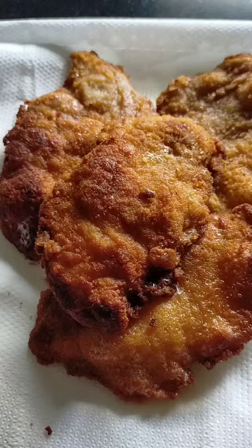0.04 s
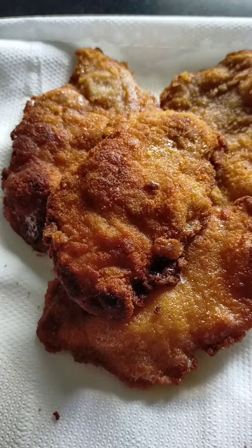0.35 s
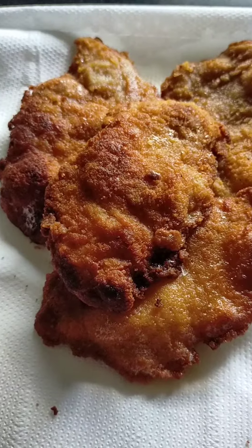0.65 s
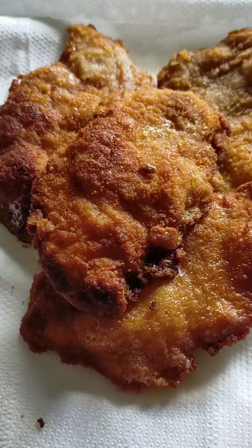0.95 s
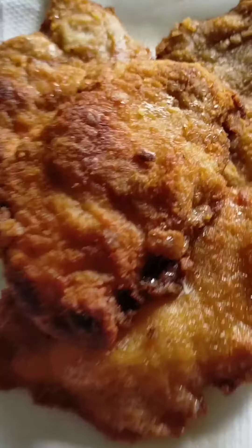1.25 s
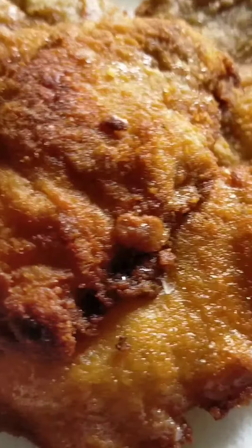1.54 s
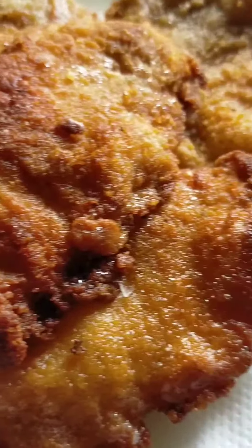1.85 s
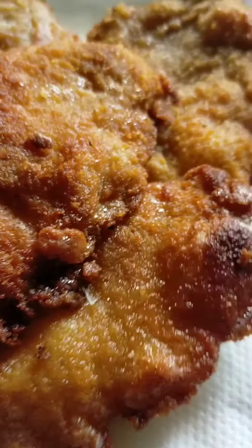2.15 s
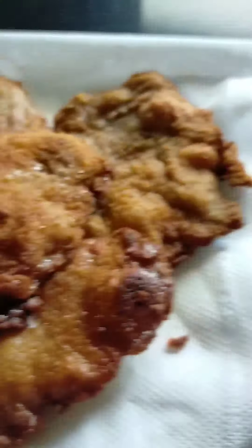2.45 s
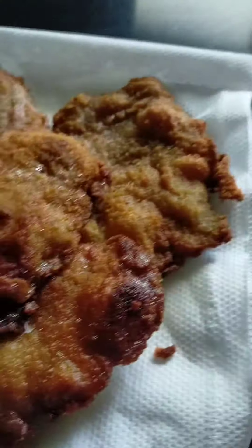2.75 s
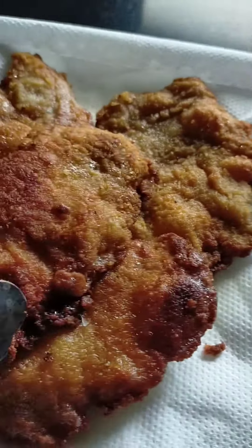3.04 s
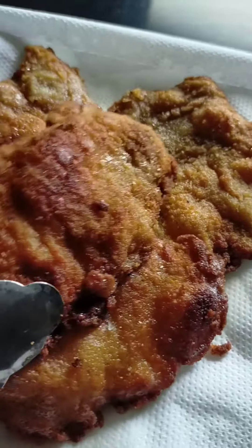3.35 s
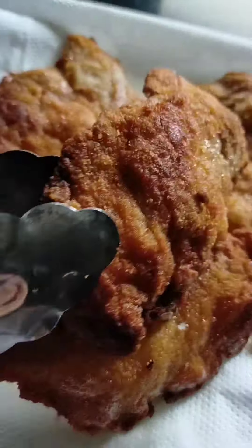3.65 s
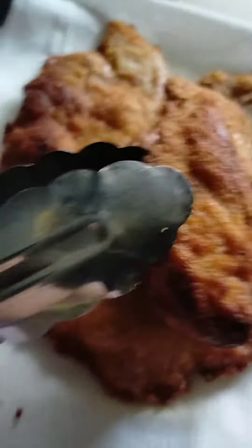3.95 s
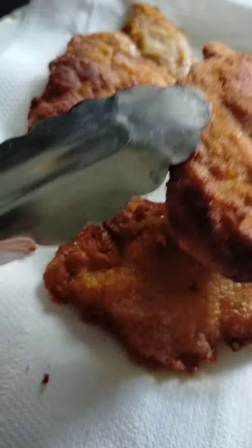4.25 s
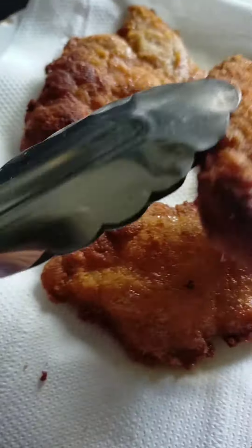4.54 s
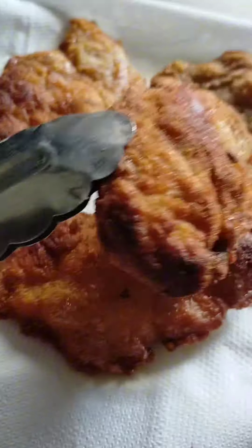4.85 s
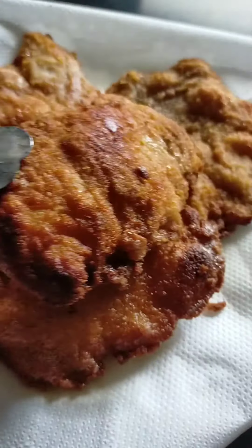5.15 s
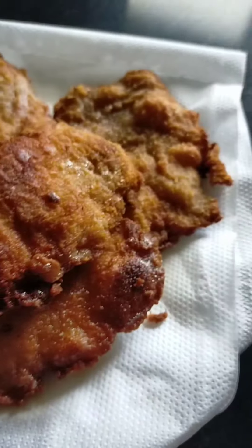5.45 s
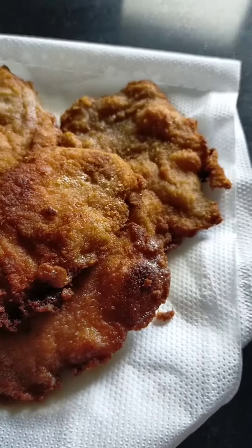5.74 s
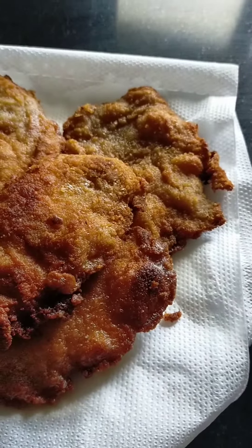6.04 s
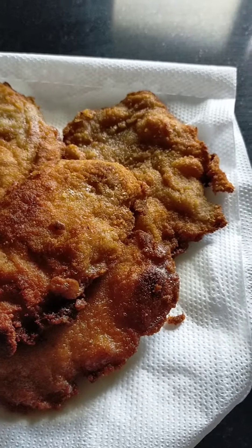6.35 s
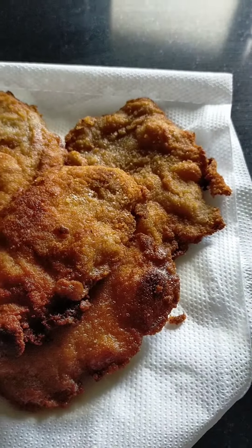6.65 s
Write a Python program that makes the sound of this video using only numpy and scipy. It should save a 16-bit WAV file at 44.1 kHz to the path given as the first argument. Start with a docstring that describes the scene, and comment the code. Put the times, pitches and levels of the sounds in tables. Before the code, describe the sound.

A faint fan hum with a thin hiss and low rumble comes in at about 0.4 seconds in a quiet kitchen. At 1.8 seconds a fingertip taps sharply right at the microphone, followed by a light brush of skin and a few small ticks. From 2.5 seconds steel tongs catch the crust of a fried breaded cutlet, very close: tiny dry crunches, crumb crackles and light metallic clicks, with soft ticks of oily meat beneath. The crunching is strongest around 3 seconds, where the steel rings slightly. Scattered crackles continue until about 4.1 seconds as the cutlet is lifted, then only a few faint ticks follow. A second, softer cluster of crunches comes from 5.1 to 5.6 seconds as it is laid back. The fan then hums on until nearly 7 seconds, with a barely audible distant chirp.

```python
"""A quiet kitchen, a phone's microphone close to the food: steel tongs bite into a crisp breaded cutlet,
lift it off a paper towel and lay it back. Each catch is a few milliseconds of tiny crust fractures,
coloured by the thin steel arms. Every move loads the arms differently and stirs loose crumbs, and the
oily meat ticks softly underneath. Before the tongs arrive a fingertip taps and brushes the phone.
A fan hums nearby, with a few faint chirps far off."""
import sys
import numpy as np
from scipy import signal
from scipy.fft import rfft, irfft, next_fast_len
from scipy.io import wavfile
from scipy.ndimage import uniform_filter1d, map_coordinates

SR = 44100
rng = np.random.default_rng(int(sys.argv[2]) if len(sys.argv) > 2 else 0)


def put_to_file(sound):
    """Save the sound as 16-bit audio at rate SR, in the file named by the first command-line argument."""
    columns = np.atleast_2d(sound).T  # one column per channel
    safe = np.clip(columns, -1, 1)
    whole_steps = np.round(safe * 32767)
    wavfile.write(sys.argv[1], SR, whole_steps.astype(np.int16))


N = 300321
TIME = np.arange(N) / SR

# Levels in the tables are relative; each source sets its own gain.
# clear catches of the tongs on the crust: middle_s, length_s, level_db, crunch_db, sparkle_db
CLEAR_CATCHES = [(2.5409, 0.0047, -43, -8, -6), (2.5633, 0.0087, -48, -2.0, -7),
                 (2.62, 0.0031, -46, -8, 2.0), (2.6287, 0.0041, -41, -8.0, 3.0),
                 (2.712, 0.0032, -40.5, -16, -8), (2.7366, 0.0039, -42, -7.0, -4),
                 (2.7543, 0.0033, -35, -7.0, 5), (2.78, 0.0031, -43, -12, 4), (2.839, 0.0056, -57, 3.5, -3),
                 (2.9042, 0.0019, -42.5, -5, 3.0), (2.9096, 0.0028, -42, -6, 6),
                 (2.944, 0.0037, -32.5, -11, 5), (2.9496, 0.0026, -36.5, -5, 3),
                 (2.979, 0.0032, -31.5, -6.5, 8), (2.989, 0.0057, -39, -11, 1.0),
                 (2.9997, 0.0057, -24.0, -8.5, -2.5), (3.02, 0.0019, -38, 0, 11),
                 (3.0328, 0.0099, -31, -5.5, 1), (3.041, 0.0075, -28, -10.5, 1.0),
                 (3.0503, 0.0069, -23.5, -5, -1.0), (3.0561, 0.0059, -27.5, -8, -0.5),
                 (3.0622, 0.005, -21.5, -13.5, 1), (3.07, 0.008, -28.5, -10, 1),
                 (3.11, 0.0049, -41, -10.0, 1), (3.1328, 0.0044, -46, -8.0, 7),
                 (3.1448, 0.0078, -38.5, -3.5, 1), (3.2678, 0.0031, -35.5, -14, -1),
                 (3.278, 0.0067, -38.5, -13, 1.5), (3.341, 0.0082, -47, -7, 6.0),
                 (3.4254, 0.014, -45, -8.5, -0.5), (3.487, 0.0033, -45.5, -3, 3.5),
                 (3.505, 0.0017, -46.5, -2, 9), (3.5226, 0.0019, -30.5, -11.0, 5.5),
                 (3.59, 0.0032, -54, -13, 2.0), (3.6144, 0.0026, -35.5, -7.5, 0.0),
                 (3.6826, 0.0026, -29.5, -5, 1), (3.6866, 0.0024, -33.5, -4.0, -1.0),
                 (3.733, 0.0055, -51, -12, -2), (3.8555, 0.0019, -53, -20, 5.5),
                 (3.912, 0.0019, -39.0, -0.5, 7), (3.9363, 0.0015, -36.5, -5, 5.5),
                 (3.97, 0.00074, -36, -11, 9), (3.9776, 0.0011, -37, -5.5, 10),
                 (4.0313, 0.002, -36.0, -26, 1.5), (4.0522, 0.002, -43.5, -13.5, 12.5),
                 (4.102, 0.0018, -46, -12, 6), (4.393, 0.0046, -58.5, -0.5, 2.5),
                 (4.541, 0.006, -54.5, -7, 1), (4.7873, 0.0012, -61, 0.0, 14),
                 (4.84, 0.0019, -58.5, -12.0, 8), (5.134, 0.0025, -47.5, -12, 9),
                 (5.1997, 0.0031, -48, -10.0, 4.0), (5.2279, 0.0026, -36, -3, 6.0),
                 (5.231, 0.0043, -42, -2.5, 11.5), (5.2466, 0.006, -41, -9, -1),
                 (5.2766, 0.0048, -34, -15, 5), (5.2842, 0.0048, -33.5, -10.5, 2),
                 (5.298, 0.0097, -43.5, -5, 7), (5.3346, 0.0028, -34.5, -10.5, 1),
                 (5.3957, 0.0031, -48, -13, -2.0), (5.5495, 0.0032, -47.5, -14.0, 6.0),
                 (5.5709, 0.0045, -47.0, -10.5, 1.0)]
# tongs gripping, lifting, laying down: start_s, end_s, crumbs_db, nicks_db, arm_clink_hz, tip_clink_hz
TONG_MOVES = [(2.543, 2.645, -46.5, -56, 2800, 7580), (2.74, 2.86, -51, -54.5, 3000, 7120),
              (2.936, 3.0, -46, -51, 2901, 6820), (3.04, 3.08, -58, -54, 3380, 7870),
              (3.094, 3.193, -43, -53, 3386, 7530), (3.23, 3.36, -46.5, -66, 3300, 7400),
              (3.424, 3.755, -50.5, -53.5, 2590, 7480), (3.942, 4.056, -53.5, -50, 3120, 7660),
              (4.373, 4.406, -61.5, -57.5, 1830, 8020), (4.508, 4.671, -72, -64, 1840, 6930),
              (5.047, 5.18, -73, -67.5, 3450, 7000), (5.235, 5.41, -50.5, -60, 3850, 6500),
              (5.525, 5.574, -53, -57, 3970, 7100), (5.593, 5.619, -48.5, -49, 4000, 6100)]
# resonances of the steel arms: pitch_hz, width_hz, level_db
ARM_MODES = [(2528, 320, -7), (3300, 340, -9), (4655, 200, -22), (5950, 150, -7), (6250, 200, -4.5),
             (6530, 200, -7.5), (7620, 180, -7.5), (7760, 83, -4), (10260, 120, -17.5), (10970, 284, -13),
             (13500, 260, -5), (14590, 200, -1.5), (14840, 220, 6.5)]
# what rings on in the steel: pitch_hz, level_db, t60_s
RING_MODES = [(2510, -7, .4), (3284, -6, .6), (3440, -5, .5), (3849, -6, .5), (4640, -9, .5),
              (5720, -4, .4), (6053, -5, .22), (6192, -7, .22), (6853, -4, .3), (7417, -1, .38),
              (7538, -2, .42), (7769, 3, .48), (8064, -5, .55), (9686, -9, .35), (9841, -7, .35),
              (10769, -9, .3), (13360, -5, .45), (14230, -6, .35), (14610, -3, .25), (15036, 2, .32),
              (15177, 2, .32)]
# breaking crust, heard directly: frequency_hz, level_db
CRUST_SPECTRUM = [(300, -37.5), (1000, -3.5), (2200, -4.5), (4300, -5.5), (6500, 5), (8000, 0.5),
                  (9300, -8), (12000, -7.5), (15000, 5.5)]
# soft ticks of oily meat: start_s, level_db, pitch_hz
MEAT_TICKS = [(2.766, -39.5, 556), (2.837, -41, 1030), (2.874, -43, 1024), (2.902, -32, 919),
              (2.962, -33, 964), (2.988, -31.5, 751), (3.03, -39, 653), (3.335, -35, 500),
              (3.383, -37.5, 600)]
# the cutlet dragging over the others: peak_s, rise_fall_s, level_db
MEAT_DRAGS = [(2.57, 0.02, -53.5), (2.765, 0.053, -50), (2.985, 0.0364, -44.5), (3.055, 0.022, -46.5),
              (3.275, .02, -50), (3.34, 0.021, -41), (3.7, 0.16, -54.5)]
# dull rub of the meat: frequency_hz, level_db
MEAT_SPECTRUM = [(60, -15.5), (300, -5), (800, -2), (1600, -10), (3000, -11), (6000, -40)]
# the phone's case ticking under the fingers: start_s, peak_db, brightness_hz
CASE_TICKS = [(1.758, -45, 1490), (1.7765, -38, 1400), (1.781, -36, 900), (1.7995, -39, 1300),
              (1.898, -38.5, 4750), (1.978, -43.5, 7650), (2.056, -52, 10000)]
# light brushes of skin on the case: peak_s, rise_fall_s, level_db
SKIN_BRUSHES = [(1.27, .09, -72), (1.765, 0.063, -54.5), (2.015, 0.051, -64.5), (2.19, 0.034, -63),
                (2.35, 0.035, -69)]
# skin rubbing right by the microphone: frequency_hz, level_db
SKIN_SPECTRUM = [(80, -1), (300, 1.5), (1300, -1), (2500, -5.5), (4300, -12), (5600, -10.5), (7000, -2.5),
                 (9200, -16.5), (13000, -1), (15000, -5)]
# swells of faint low rumble: peak_s, rise_fall_s, level_db
RUMBLE_SWELLS = [(.7, .42, -58.5), (3.35, .07, -61)]
# colour of the low rumble: frequency_hz, level_db
RUMBLE_SPECTRUM = [(12, -10), (30, 0.5), (70, -2.5), (110, -14.5), (250, -35), (800, -79)]
# the fan's draught and the thin hiss over it: time_s, air_db, hiss_db
FAN_LEVELS = [(.41, -64.5, -78), (1.1, -58.5, -73.5), (2.2, -56.5, -74.5), (4.5, -58.5, -75),
              (5.6, -58, -77), (6.8, -60, -80)]
# fan and motor tones: pitch_hz, level_db
MOTOR_TONES = [(36.5, -71.5), (100, -76.5), (246, -66.5), (371.5, -76.5), (495.5, -76), (1017, -80),
               (1238, -83.5)]
# thin whine of a bearing: start_s, end_s, pitch_hz, level_db
BEARING_WHINES = [(.45, 1.75, 2190, -78), (.45, 1.75, 2450, -77.5), (4.4, 7, 2423, -83)]
# air moved by the fan: frequency_hz, level_db
AIR_SPECTRUM = [(15, -31.5), (30, -20), (48, -16), (64, -13.5), (85, -7), (190, -3.5), (240, -0.5),
                (290, -4.5), (400, -8.5), (800, -11.5), (1300, -15.5), (2400, -22), (3800, -32),
                (9000, -47)]
# thin background hiss: frequency_hz, level_db
HISS_SPECTRUM = [(1500, -19.5), (4000, -12.5), (7200, 0), (9300, -7), (12000, -3.5), (15000, -0.5)]
# faint far-off chirps: peak_s, half_length_s, pitch_hz, level_db
FAR_CHIRPS = [(.66, .04, 4400, -84), (1.333, 0.077, 3580, -77), (4.702, 0.074, 4200, -84.5),
              (6.73, 0.055, 4100, -81)]
# the kitchen's reverberation: frequency_hz, t60_s
ROOM_DECAY = [(200, 0.22), (3000, 0.2), (8000, 0.09), (15000, 0.083)]


def catches(rows, sharpness=1.7, attack=.9, gain_db=.16, wander=.04):
    """Close up, each catch is a short avalanche of fractures; the nearest move pitches its two clinks."""
    middle_s, length_s, level_db, crunch_db, sparkle_db = np.transpose(rows)[:, :, None]
    moves = np.array(TONG_MOVES)
    nearest = np.argmin(np.maximum(moves[:, 0] - middle_s, middle_s - moves[:, 1]), axis=1)
    detuning = 1 + wander * rng.standard_normal((len(rows), 2))
    arm_hz, tip_hz = (moves[nearest, 4:] * detuning).T[:, :, None]
    t = np.arange(1792) / SR - .012
    progress = t / length_s
    force = np.exp(-(sharpness * np.where(progress < 0, progress / attack, progress)) ** 2)
    fractures = force * crackle(force.shape, spread_db=3)
    bursts = through_tongs(fractures, crust_db=-12.5, scatter_db=3.5, detune=.0086)
    arm_clink = lambda f: amp(10) * resonance(f, arm_hz, width_hz=260)
    tip_clink = lambda f: amp(4) * resonance(f, tip_hz, width_hz=280)
    bursts = filtered(bursts, lambda f: 1 + arm_clink(f) + tip_clink(f))
    balanced = 0
    for low_hz, high_hz, band_db in [(700, 5000, crunch_db), (5000, 9500, 0), (9500, 16500, sparkle_db)]:
        band = signal.sosfilt(signal.butter(4, [low_hz, high_hz], "band", fs=SR, output="sos"), bursts)
        energy = np.sum(band ** 2, axis=1, keepdims=True) / SR
        balanced += band * np.sqrt(length_s / energy) * amp(level_db + band_db + gain_db)
    track = np.zeros(N)
    for start_s, burst in zip(middle_s[:, 0] + t[0], balanced):
        add(track, start_s, burst)
    return track


def nicks(count=24, per_s=40, length_s=.0037, scatter_db=3, crunch_db=-4.5, sparkle_db=3):
    """The tongs nick the crust in small catches at chance moments of each move."""
    rows = []
    for start_s, end_s, _, usual_db, *_ in TONG_MOVES:
        times = start_s + (np.arange(count) + rng.random(count)) / per_s
        size, stretch = rng.standard_normal((2, count))
        lengths = length_s * np.exp(.3 * stretch)
        levels = usual_db + scatter_db * size
        rows += [(s, length, db, crunch_db, sparkle_db)
                 for s, length, db in zip(times, lengths, levels) if s < end_s]
    return catches(rows)


def through_tongs(x, crust_db, scatter_db=0, detune=0):
    """Fractures reach the microphone directly and through the arms, whose modes vary with the grip."""
    push, shift = rng.standard_normal((2, len(ARM_MODES)) + x.shape[:-1] + (1,))
    arms = lambda f: sum(
        (-1) ** k * amp(db + scatter_db * push[k]) * resonance(f, hz * (1 + detune * shift[k]), width_hz)
        for k, (hz, width_hz, db) in enumerate(ARM_MODES))
    return filtered(x, lambda f: arms(f) + 1j * amp(crust_db + along(CRUST_SPECTRUM, f)))


def steel_ring(blows, ring_db=-18, hard_db=-22):
    """Meat damps the arms, so only hard catches leave them ringing."""
    t = np.arange(SR * 3 // 4) / SR
    ring = sum(amp(db - 60 * t / t60_s) * np.sin(2 * np.pi * (hz * t + rng.random()))
               for hz, db, t60_s in RING_MODES)
    force = np.sqrt(np.abs(uniform_filter1d(blows ** 2, size=SR // 100)))
    hard_blows = blows * force / (force + amp(hard_db))
    return amp(ring_db) * signal.fftconvolve(hard_blows, ring / np.linalg.norm(ring))[:N]


def crumbs(gain_db=-3, clump_db=3.5):
    """Loose breading crackles drily in little clumps during each move."""
    clumps = crackle(N, spread_db=6.5) * amp(clump_db * wobble(140))
    grains = unit(through_tongs(clumps, crust_db=-2.5))
    stirring = sum(amp(db) * held(start_s, end_s, attack_s=.008, release_s=.038)
                   for start_s, end_s, db, *_ in TONG_MOVES)
    return amp(gain_db) * grains * stirring


def meat(decay_s=.0011, tick_db=-1, drag_db=-2):
    """The oily underside lets go in damped ticks and drags dully over the other cutlets."""
    ticks, t = np.zeros(N), np.arange(SR // 40) / SR
    envelope = t / decay_s * np.exp(1 - t / decay_s)
    for start_s, db, hz in MEAT_TICKS:
        add(ticks, start_s, amp(db + tick_db) * envelope * np.sin(2 * np.pi * hz * t))
    rub = coloured(crackle(N, spread_db=7.5) * amp(3 * wobble(120)), MEAT_SPECTRUM)
    return ticks + amp(drag_db) * swells(MEAT_DRAGS) * rub


def tray(bump_s=3.064):
    """The cutlet's weight bumps the tray as the tongs close."""
    track = np.zeros(N)
    add(track, bump_s, thump(db=-47.5, hz=55, decay_s=.014))
    return track


def fingertip(tap_s=1.7691, slide_s=.046, slide_db=-44, tick_decay_s=.0027):
    """Right at the microphone, a fingertip taps the case; skin brushes and slides with small ticks."""
    track, t = np.zeros(N), np.arange(SR // 50) / SR
    snap = thump(db=-24, hz=7300, decay_s=.00015) + thump(db=-14, hz=12600, decay_s=.00018)
    push = thump(db=-.5, hz=840, decay_s=.0003)
    flex = thump(db=-33, hz=100, decay_s=.0072)
    add(track, tap_s, -snap)
    add(track, tap_s + .00016, push)
    add(track, tap_s + .0022, -flex)
    for start_s, peak_db, hz in CASE_TICKS:
        burst = np.exp(-t / tick_decay_s) * rng.standard_normal(len(t))
        tick = filtered(burst, lambda f: resonance(f, hz, width_hz=hz))
        add(track, start_s, amp(peak_db) * tick / np.abs(tick).max())
    slide = amp(slide_db) * held(tap_s, tap_s + slide_s, attack_s=.001, release_s=.01)
    skin = coloured(crackle(N, spread_db=4.5), SKIN_SPECTRUM)
    return track + (slide + swells(SKIN_BRUSHES)) * skin


def low_rumble(lumpy_db=1.5):
    """A faint uneven low rumble, strongest just after the microphone switches on."""
    uneven = rng.standard_normal(N) * amp(lumpy_db * wobble(14))
    return swells(RUMBLE_SWELLS) * coloured(uneven, RUMBLE_SPECTRUM)


def fan(waver_rad=.72, flutter_rad=.27, whine_fade_s=.084):
    """A nearby fan moves air, with unsteady motor tones and a fluttering whine, over a thin hiss."""
    air_db, hiss_db = curves(FAN_LEVELS)
    rush = amp(air_db + .97 * wobble(8)) * coloured(rng.standard_normal(N), AIR_SPECTRUM)
    tones = sum(amp(db + 1.5 * wobble(4)) * unit(np.sin(2 * np.pi * hz * TIME + waver_rad * wobble(5)))
                for hz, db in MOTOR_TONES)
    for start_s, end_s, hz, db in BEARING_WHINES:
        gate = np.clip(np.minimum(TIME - start_s, end_s - TIME) / whine_fade_s, 0, 1)
        gain = gate * amp(db + 2 * wobble(25))
        tones += gain * unit(np.sin(2 * np.pi * hz * TIME + flutter_rad * wobble(60)))
    hiss = amp(hiss_db) * coloured(rng.standard_normal(N), HISS_SPECTRUM)
    return rush + amp(air_db - air_db.mean()) * tones + hiss


def chirps(width_hz=600):
    """Distance blurs each chirp into a soft narrow swell."""
    band = lambda hz: unit(filtered(rng.standard_normal(N), lambda f: resonance(f, hz, width_hz) ** 2))
    return sum(amp(db) * np.exp(-((TIME - peak_s) / half_length_s) ** 2) * band(hz)
               for peak_s, half_length_s, hz, db in FAR_CHIRPS)


def kitchen(x, room_db=-14, echo_gain=.0706):
    """The counter and near walls give a few quick echoes, the room a short diffuse tail."""
    hz, t, noise = signal.stft(rng.standard_normal(SR // 2), SR, nperseg=256)
    decay = amp(-60 * t / along(ROOM_DECAY, hz)[:, None])
    tail = signal.istft(noise * decay, SR, nperseg=256)[1]
    response = amp(room_db) * np.pad(tail / np.linalg.norm(tail), (SR // 300, 0))
    for delay_s in rng.uniform(.0009, .007, size=4):
        add(response, delay_s, [echo_gain])
    return signal.fftconvolve(x, response)[:N]


def crackle(shape, spread_db):
    """Dense tiny fractures of very unequal size."""
    return rng.standard_normal(shape) * amp(spread_db * rng.standard_normal(shape))


def thump(db, hz, decay_s):
    """One quickly damped push."""
    t = np.arange(SR // 10) / SR
    return amp(db) * np.exp(-t / decay_s) * np.sin(2 * np.pi * hz * t)


def resonance(f, hz, width_hz):
    """Causal response of one mode, 1 at its peak."""
    return 1j * f * width_hz / (hz * hz - f * f + 1j * f * width_hz)


def swells(rows):
    """Gain that rises to each row's peak and falls away again."""
    return sum(amp(db) * np.exp(-np.abs(TIME - peak_s) / rise_fall_s) for peak_s, rise_fall_s, db in rows)


def held(start_s, end_s, attack_s, release_s):
    """Gain that rises up to start_s, holds until end_s and dies away."""
    return np.exp(np.minimum((TIME - start_s) / attack_s, 0) - np.maximum((TIME - end_s) / release_s, 0))


def wobble(knots_per_s):
    """A smooth random curve."""
    return map_coordinates(rng.standard_normal(int(N * knots_per_s / SR) + 4), [TIME * knots_per_s])


def curves(rows):
    """One value per sample for each column after the time."""
    time_s, *columns = np.transpose(rows)
    return [np.interp(TIME, time_s, column) for column in columns]


def along(points, hz):
    """Interpolate (frequency_hz, value) points on a log frequency axis."""
    point_hz, values = np.transpose(points)
    return np.interp(np.log(hz + 1), np.log(point_hz + 1), values)


def filtered(x, response):
    """x through a frequency response."""
    size = next_fast_len(x.shape[-1] * 5 // 4)
    return irfft(rfft(x, size) * response(np.fft.rfftfreq(size, 1 / SR)), size)[..., :x.shape[-1]]


def coloured(x, spectrum):
    """x shaped by a spectrum, at rms 1."""
    return unit(filtered(x, lambda hz: amp(along(spectrum, hz))))


def amp(db):
    """Decibels to gain."""
    return 10 ** (np.asarray(db) / 20)


def unit(x):
    """x at rms 1."""
    return x / np.sqrt(np.mean(x ** 2) + 1e-20)


def add(track, start_s, x):
    """Mix x into the track."""
    part = track[round(start_s * SR):][:len(x)]
    part += x[:len(part)]


def scene():
    """One microphone: tongs and food up close in the room, the fan and chirps behind."""
    around = fingertip() + low_rumble() + fan() + chirps()
    bites = catches(CLEAR_CATCHES)
    food = bites + steel_ring(bites) + crumbs() + meat() + tray() + nicks()
    return (food + kitchen(food) + around)[None]


def record(dry, on_s=.41, fade_s=.0051, bias_db=-28.5, rise_s=.056, settle_s=.9, top_hz=15550):
    """The microphone switches on, its bias drifts back to rest, and the top treble is cut."""
    t = np.maximum(TIME - on_s, 0)
    bias = -amp(bias_db) * (1 - np.exp(-t / rise_s)) * np.exp(-(t / settle_s) ** 1.7)
    live = dry * (1 - np.exp(-t / fade_s)) + bias
    return filtered(live, lambda hz: amp(-np.clip((hz - top_hz) / 15, 0, 120)))


dry = scene()
out = record(dry)
put_to_file(out)
```